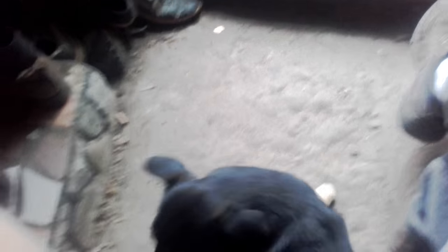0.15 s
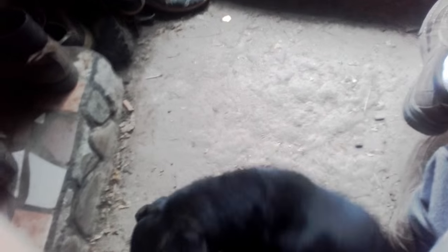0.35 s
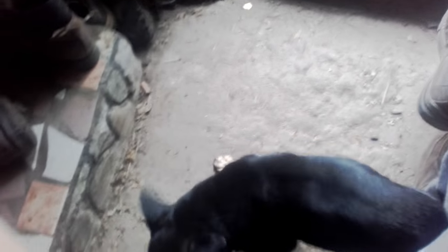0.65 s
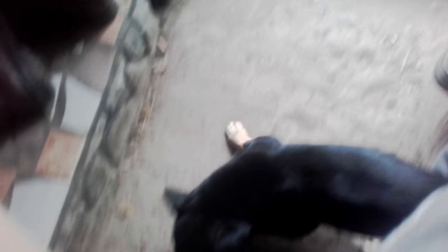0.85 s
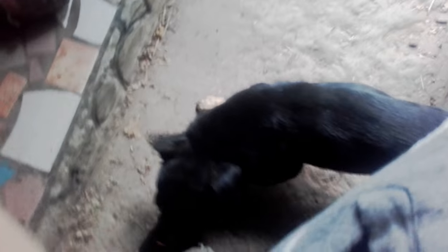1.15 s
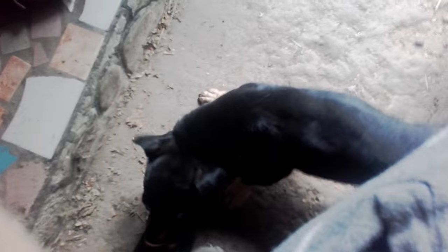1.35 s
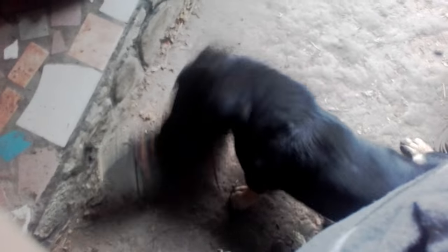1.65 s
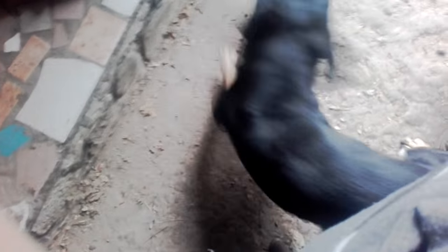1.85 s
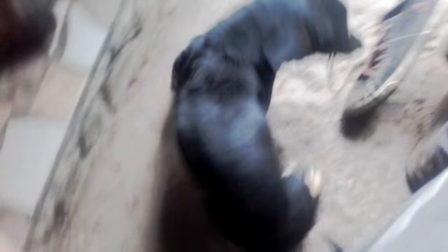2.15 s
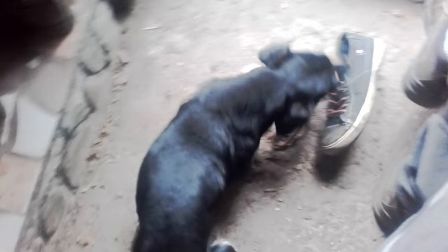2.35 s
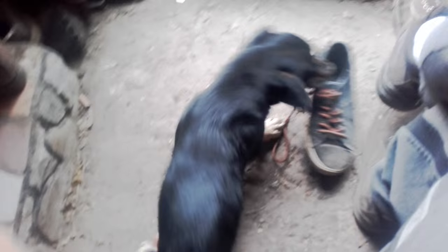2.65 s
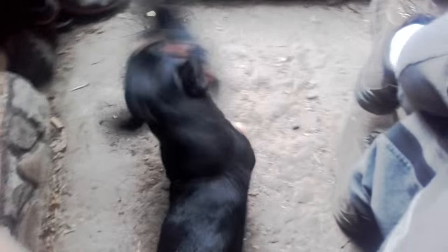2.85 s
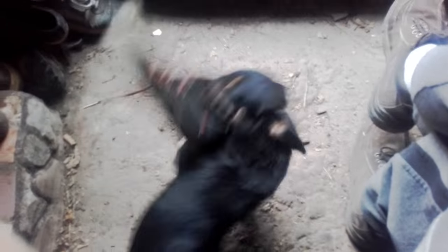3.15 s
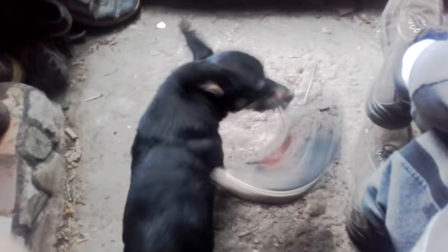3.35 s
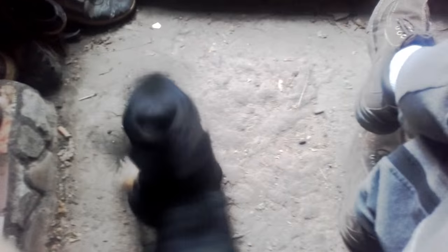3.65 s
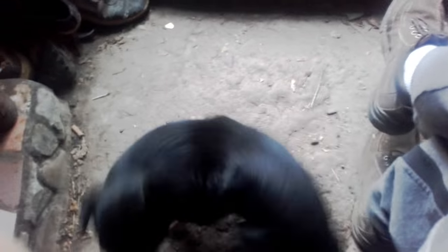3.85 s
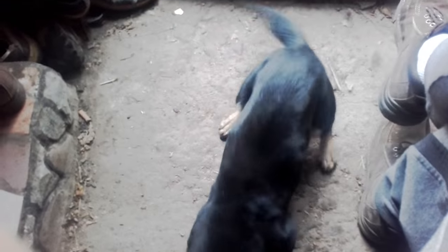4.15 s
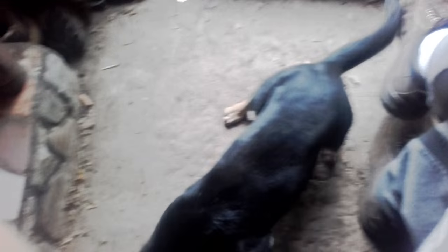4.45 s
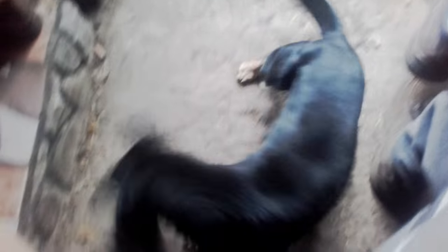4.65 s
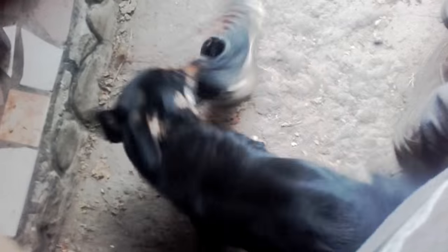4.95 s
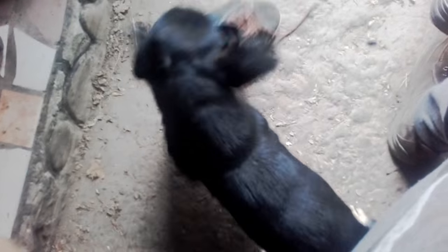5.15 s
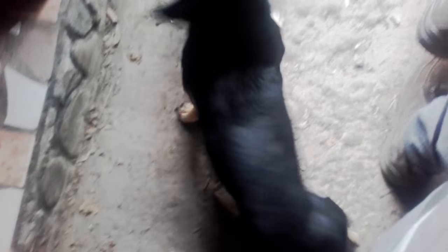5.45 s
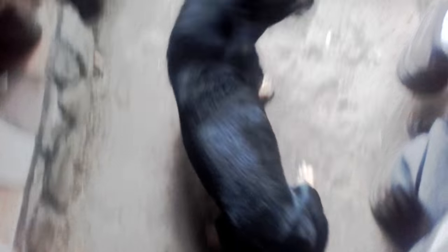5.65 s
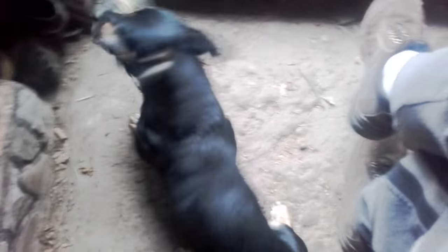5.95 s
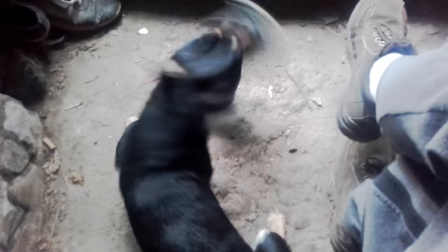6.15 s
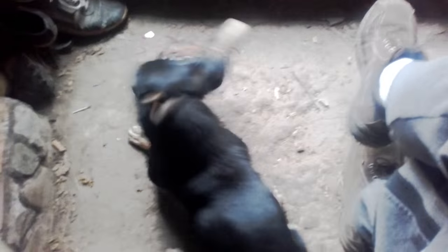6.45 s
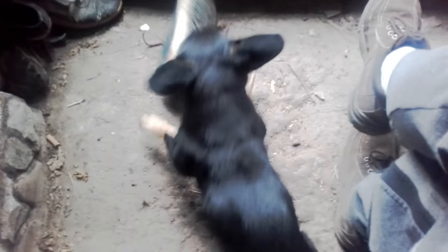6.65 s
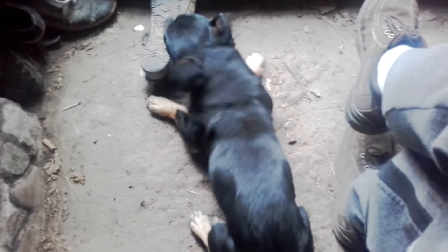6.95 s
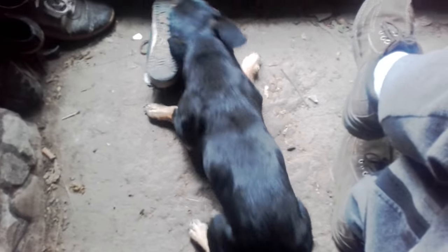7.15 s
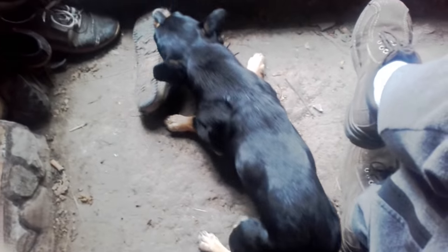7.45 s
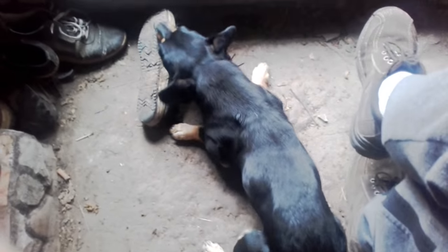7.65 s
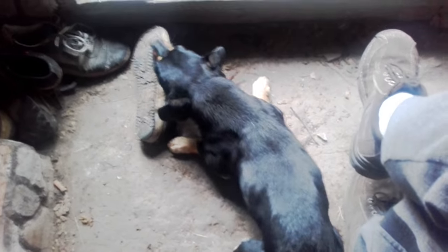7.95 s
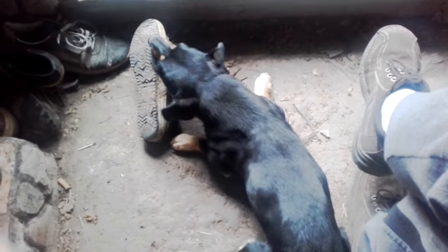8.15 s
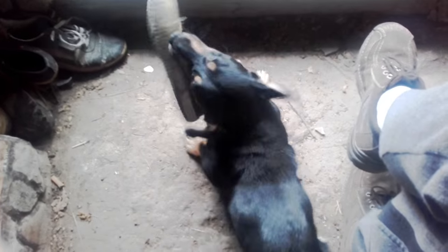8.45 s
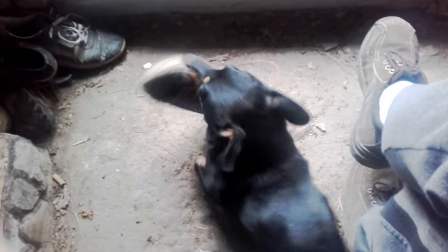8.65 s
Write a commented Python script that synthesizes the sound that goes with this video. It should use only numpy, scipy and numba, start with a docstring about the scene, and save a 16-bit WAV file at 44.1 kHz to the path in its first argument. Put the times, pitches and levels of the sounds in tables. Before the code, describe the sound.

Up close in a small hard-walled yard corner, a playful little dog snarls over a shoe. A brief opening growl gives way to puffing snorts, light grit and a far bird, then repeated raspy growls with rattling throbs and hissing breath through the teeth. Short pauses carry sniffs, scrabbling claws and muffled thumps on dirt. The thin, slightly bass-light phone sound has only a short echo and faint steady background air.

```python
"""Small dog growling over a shoe

A small dog growls in short bouts while it worries a shoe on a dirt floor, close to a phone.
Ragged vocal-fold pulses, broken into throbs by flapping throat tissue, ring its mouth and chest.
Filtered noise bursts and swells make snorts, sniffs, knocks, claw ticks and grit; far off, gliding
sines make a bird's chirps. Resonances and sparse echoes make the corner and walls answer briefly."""
import sys
import numpy as np
from scipy import signal
from scipy.fft import rfft, irfft
from scipy.io import wavfile
from scipy.ndimage import uniform_filter1d, minimum_filter1d
from numba import njit

SR = 44100
rng = np.random.default_rng(int(sys.argv[2]) if len(sys.argv) > 2 else 0)


def dump_mix(stems):
    """Bounce the given channels to the path in sys.argv[1] as a 16-bit WAV at rate SR."""
    frames = np.atleast_2d(stems).T  # one column per channel
    limited = np.clip(frames, -1, 1)  # hard clip at full scale
    pcm = np.round(limited * 32767).astype(np.int16)
    wavfile.write(sys.argv[1], SR, pcm)


N = 388521
T = np.arange(N) / SR


def undb(db):
    """Decibels to amplitude ratio."""
    return 10 ** (np.asarray(db) / 20)


def unit(x):
    """Scale to rms 1."""
    return x / np.sqrt(np.mean(x ** 2))


def steady(x, window_s=0.11):
    """Even out slow swells to rms near 1, keeping changes faster than the window."""
    size = int(window_s * SR)
    power = uniform_filter1d(uniform_filter1d(x ** 2, size), size)
    return x / np.sqrt(np.abs(power) + 1e-12)


def noise():
    """White noise of spread 1."""
    return rng.standard_normal(N)


def walk(rate_hz):
    """Smooth random curve of rms 1 that draws a new target rate_hz times a second."""
    size = int(SR / rate_hz)
    steps = rng.standard_normal(N // size + 1)[np.arange(N) // size]
    return unit(uniform_filter1d(steps, size))


@njit
def svf(x, hz, width_hz):
    """State-variable band-pass with a moving centre."""
    y, band_state, low_state = np.empty(len(x)), 0., 0.
    for i in range(len(x)):
        g, k = np.tan(np.pi * hz[i] / SR), width_hz / hz[i]
        v = (band_state + g * (x[i] + 1e-18 - low_state)) / (1 + g * (g + k))
        band_state, low_state, y[i] = 2 * v - band_state, low_state + 2 * g * v, k * v
    return y


def ring(x, hz, width_hz):
    """Resonance with steep skirts: two equal band-passes in series, width_hz each."""
    centre_hz = np.clip(hz * np.ones(N), 30, SR * .45)
    once = svf(x, centre_hz, float(width_hz))
    return svf(once, centre_hz, float(width_hz))


def cavity(x, modes, stretch=1):
    """Several parallel resonances that shift together."""
    return sum(undb(db) * ring(x, hz * stretch, width_hz) for hz, width_hz, db in modes)


def colour(x, points):
    """Shape a sound by a (Hz, dB) spectrum, straight lines over log frequency."""
    hz, db = np.transpose(points)
    bins_hz = np.maximum(np.fft.rfftfreq(N, 1 / SR), 1)
    gain_db = np.interp(np.log(bins_hz), np.log(hz), db)
    return irfft(rfft(x) * undb(gain_db), N)


def band(x, low_hz, high_hz, order=5):
    """Band-pass, steep by default."""
    return signal.sosfilt(signal.butter(order, [low_hz, high_hz], "band", fs=SR, output="sos"), x)


def burst(start_s, t60_s, rise_s):
    """Envelope of a quick push that dies away."""
    out = np.zeros(N)
    live = slice(*np.searchsorted(T, [start_s, start_s + 2 * t60_s]))
    age_s = T[live] - start_s
    out[live] = (1 - np.exp(-age_s / rise_s)) * np.exp(-age_s / t60_s * np.log(1000))
    return out


def follow(rows):
    """Join the points of a curve by straight lines: one control a column."""
    s, *columns = np.transpose(rows)
    return [np.interp(T, s, column) for column in columns]


def during(course, fade_s):
    """1 while a gesture lasts, fading to 0 on both sides."""
    first_s, last_s = course[0][0], course[-1][0]
    return np.interp(T, [first_s - fade_s, first_s, last_s, last_s + fade_s], [0, 1, 1, 0])


def yard_air(level_db=-63, waver_db=1.3):
    """Steady coloured noise of the quiet yard, wavering slightly."""
    # air spectrum: hz, level_db
    air_colour = [(100, -15.5), (300, -5), (1800, -1.5), (3300, -17), (5200, -19.5), (15000, -20.5)]
    return unit(colour(noise(), air_colour)) * undb(level_db + waver_db * walk(21))


def rumble(level_db=-88):
    """Faint low noise of the hand-held microphone."""
    return unit(ring(noise(), 30, 60)) * undb(level_db)


def tension(hz, usual_rough=.81, clearing_s=.08):
    """Pitch and roughness (0-1) of the folds: ragged, except where they settle into a clear tone."""
    # clear gliding tones, one list each: time_s, pitch_hz, roughness (0-1)
    clear_tones = [
        [(0.328, 360.4, 0.63), (0.42, 348.5, 0.28), (0.488, 315, 0.05), (0.55, 272, 0.19), (0.63, 226.4, 0.33)],
        [(2.25, 351.7, 0.59), (2.46, 304.8, 0.33), (2.64, 300.6, 0.23), (2.8, 322.6, 0.25), (2.95, 322.5, 0.63)],
        [(3.88, 316.7, 0.6), (4.03, 307.8, 0.49)],
        [(4.81, 388.7, 0.56), (4.86, 380.2, 0.46), (4.92, 344.7, 0.24), (5.03, 326.8, 0.25),
         (5.13, 280.4, 0.18), (5.25, 270.8, 0.5)],
        [(5.86, 344.9, 0.6), (6.02, 385.3, 0.62), (6.4, 365.4, 0.7), (6.54, 316, 0.46)],
    ]
    rough = usual_rough
    for tone in clear_tones:
        share = during(tone, clearing_s)
        tone_hz, tone_rough = follow(tone)
        hz = hz + share * (tone_hz - hz)
        rough = rough + share * (tone_rough - rough)
    return hz, np.clip(rough, 0, 1)


def folds(hz, rough, jitter=.15, shimmer_db=4, breath_db=2, limp_db=3, leak=0.94):
    """One pulse a cycle, and air through folds that never quite close; when rough, cycles wander and limp."""
    wander = np.exp(jitter * rough * walk(260) + .03 * walk(45))
    cycles = np.cumsum(hz * wander) / SR
    count, phase = cycles.astype(int), cycles % 1
    # random size each cycle; alternate cycles strong and weak
    size = undb(rough * (shimmer_db * noise()[count] + limp_db * (-1) ** count))
    pulses = unit(np.sinc((phase - .5) * SR / hz / 2))
    opening = leak + np.exp(-2 * ((phase - .5) % 1))
    air = size * unit(noise() * opening)
    voice = (1 - 0.5 * rough) * size * pulses + undb(breath_db) * rough * air
    hum = np.cos(2 * np.pi * cycles)
    return voice, air, hum


def flutter(depth_db, rate_hz=36, spread=.28, uneven=0.3, half_s=0.0077, clear_s=.021):
    """Loose throat tissue flaps unevenly and lets the voice out in flat-topped throbs; gives dB."""
    # hardest jolts, before each part's depth factor: time_s, height_db
    jolts = [(0.243, 8), (0.274, 10), (0.376, 23), (0.418, 22), (0.452, 23), (0.495, 15), (2.242, 7.5),
             (2.263, 5.5), (2.314, 12.5), (2.341, 9), (2.379, 9), (2.4, 12.5), (2.428, 13), (2.498, 14),
             (2.537, 6), (2.597, 18.5), (2.678, 17), (2.799, 9), (2.851, 12), (2.956, 8.5), (3.546, 6),
             (3.567, 11), (3.593, 8.5), (3.608, 18), (3.631, 12.5), (3.652, 12), (3.679, 13.5),
             (3.726, 9.5), (3.809, 5.5), (3.893, 6), (3.934, 4.5), (3.966, 9), (4.028, 11), (4.812, 3.5),
             (4.831, 10), (4.857, 14.5), (4.884, 12), (4.927, 15), (4.969, 24), (5.009, 21.5), (5.265, 12),
             (5.333, 15), (5.354, 10), (5.873, 2), (5.922, 7.5), (6.019, 4.5), (6.096, 9), (6.123, 10),
             (6.155, 5.5), (6.173, 4), (6.268, 7), (6.297, 8.5), (6.332, 16.5), (6.398, 9.5), (6.502, 14),
             (7.121, 19.5), (7.153, 9), (7.238, 12.5), (7.275, 14.5), (7.313, 6), (7.355, 5), (7.429, 11),
             (7.475, 7.5), (7.597, 10.5), (8.214, 10), (8.284, 5), (8.325, 5.5), (8.402, 5.5), (8.438, 7),
             (8.594, 3.5), (8.639, 8), (8.696, 15), (8.765, 12), (8.799, 10)]
    chance = rng.standard_normal((600, 2))
    times_s = np.cumsum(np.exp(spread * chance[:, 0])) / rate_hz
    heights_db = np.interp(times_s, T, depth_db) * np.exp(uneven * chance[:, 1])
    jolt_s = np.array(jolts)[:, 0]
    # weaker flaps only where no jolt is near
    weak = [(s, height) for s, height in zip(times_s, heights_db) if np.abs(s - jolt_s).min() > clear_s]
    db = np.zeros(N)
    for s, height in list(jolts) + weak:
        near = slice(*np.searchsorted(T, [s - 2 * half_s, s + 2 * half_s]))
        flap = height * np.exp(-np.abs((T[near] - s) / half_s) ** 3)
        db[near] = np.maximum(db[near], flap)
    return db


def rattle(rough, depth_db=4.5, rate_hz=68, spread=.15):
    """When ragged, the false folds slap open unevenly: each slap starts sharply and dies away; gives dB."""
    phase = np.cumsum(rate_hz * np.exp(spread * walk(60))) / SR % 1
    return uniform_filter1d(depth_db * rough * (.5 - phase), size=64)


def bounces(x, gain=1.0, swing=0.371):
    """Head swings close above the floor: two short, shifting reflections sweep notches through the treble."""
    out = x
    for mid_lag_s in (.0009, .0026):
        lag_s = mid_lag_s * np.exp(swing * walk(9) * .0009 / mid_lag_s)
        out = out + gain * np.interp(T - lag_s, T, x)
    return out


def snarl(air, width_hz=900, quiver=0.057, fade_s=0.034):
    """Air rings the gap under the lifted lip, narrow and gliding; gives the sound and its share in dB."""
    # lip lifts, one list each: time_s, resonance_hz, share_db
    lifts = [
        [(0.19, 5060, -30.5), (0.4, 5330, -30), (0.47, 4650, -17), (0.56, 4340, -22)],
        [(2.145, 4612, -10), (2.18, 3783, -22.5), (2.265, 4630, -26), (2.45, 4000, -27)],
        [(2.68, 2773, -17.5), (3.06, 2665, -12)],
        [(3.56, 2553, -21.5), (3.7, 2803, -19.5)],
        [(3.86, 5050, -19.5), (4.04, 5140, -30.5)],
        [(4.83, 3850, -19), (5.11, 4300, -19.5)],
        [(5.21, 2490, -7.5), (5.32, 2577, -13), (5.4, 3335, -5.5), (5.48, 3610, -3)],
        [(5.84, 3066, -18.5), (5.88, 3254, -16), (5.92, 4586, -27.5), (6.08, 4853, -25)],
        [(6.42, 5404, -26), (6.47, 4700, -29.5), (6.54, 5227, -17)],
        [(7.03, 2496, -23), (7.5, 3012, -20), (7.77, 2774, -31)],
        [(8.21, 2419, -52), (8.64, 2738, -17)],
        [(8.72, 5098, -26), (8.8, 5284, -22.5)],
    ]
    hz, share_db = follow([row for course in lifts for row in course])
    lifted = sum(during(course, fade_s) for course in lifts)
    sound = ring(air, hz * np.exp(quiver * walk(40)), width_hz)
    return sound, share_db + 20 * np.log10(np.clip(lifted, 1e-3, 1))


def throb(x, range_hz, depth_db, flicker_db=3.5):
    """Chop one resonance into throbs; each flap favours the resonances differently."""
    even = steady(band(x, *range_hz), .008)
    chopped = even * undb(depth_db + flicker_db * walk(70))
    return steady(band(chopped, *range_hz, order=2), .05)


def growl(throat_width_hz=300, pharynx_width_hz=440, palate_hz=1250, palate_width_hz=450, palate_db=-14,
          chest_hz=290, chest_width_hz=360, hum_db=-3.0, throat_db=0, teeth_db=-3, chew=0.099):
    """Throbbing voice rings throat, mouth and chest; effort sets pitch and balance, jaw shifts resonances."""
    # growls at middling effort: start_s, end_s, pitch_hz, chest_share_db, pharynx_hz, pharynx_share_db,
    # rasp_share_db, flutter_depth_db
    bout_table = [(0.131, 0.646, 337, -24, 750, -7.5, -19.5, 3.5),
                  (2.139, 3.109, 317.7, -14.5, 617, -7.5, -20.5, 3),
                  (3.535, 4.369, 305, -17, 761.7, -11, -14, 3.5),
                  (4.807, 5.495, 320.7, -16.5, 688.7, -6, -18, 10),
                  (5.81, 6.669, 344.7, -23, 632, -7.5, -21, 5.5),
                  (6.659, 6.936, 349.6, -23, 711, -1, -14, 8),
                  (7.007, 7.834, 381.1, -12.5, 706, -2.5, -19, 5.5),
                  (8.182, 8.814, 299.3, -19, 579.4, -7.5, -19, 5)]
    # course of each growl: time_s, effort_db, first_mouth_resonance_hz, bared_teeth_brightness_db
    courses = [
        [(0.13, -47, 1070, -49), (0.19, -28, 1030, -15.5), (0.27, -25, 960, -21), (0.42, -26.5, 1054, -16),
         (0.58, -44.5, 1050, -4.5), (0.68, -66, 1450, 12)],
        [(2.14, -25, 780, -5.5), (2.25, -15, 1176, -7), (2.34, -19, 1080, -16), (2.43, -24.5, 1043, -21),
         (2.7, -37.5, 1000, 4), (2.82, -30.5, 1010, -1), (2.98, -26.5, 840, -5.5), (3.08, -35.5, 1009, 1.5),
         (3.13, -48, 895, -23)],
        [(3.535, -16, 960, -8.5), (3.61, -10.5, 1302, -14.5), (3.68, -16.5, 1225, -10), (3.76, -28, 1023, -8),
         (3.81, -16, 916, -8.5), (3.93, -15.5, 893, -11.5), (4.03, -16.5, 935.3, -16.5), (4.09, -36, 940, 3),
         (4.29, -39.5, 1240, 3), (4.36, -55, 1292, -16)],
        [(4.81, -21, 1191, -2.5), (4.86, -16.5, 1130, -2.5), (4.97, -21, 1035, -2), (5.06, -27, 1052, -0.5),
         (5.17, -39, 985, -5.5), (5.27, -37, 1042, -4.5), (5.45, -40, 1330, -2), (5.51, -53, 1400, 1)],
        [(5.815, -25, 905.3, -10.5), (5.86, -12.5, 959.4, -10), (5.95, -18.5, 948, -11), (6.03, -13, 846.3, -7),
         (6.19, -16.5, 833.5, -5.5), (6.3, -11, 912.4, -9), (6.51, -17.5, 982, -13), (6.58, -30.5, 1002, 1),
         (6.66, -43, 1020, -3.5)],
        [(6.73, -41.5, 941, 2.5), (6.8, -53, 1003, 0.5), (6.87, -39, 818, 2.5), (6.94, -54, 951, -6)],
        [(7.01, -30.5, 862.4, -11), (7.04, -26.5, 902.5, -10.5), (7.21, -28.5, 905, -13.5),
         (7.38, -23.5, 1146, -6), (7.52, -26.5, 969, -5), (7.68, -30.5, 1010, 0.5), (7.78, -40, 1148, 0),
         (7.84, -59.5, 1230, -24)],
        [(8.185, -29, 1155, -2.5), (8.22, -20.5, 1058, -7), (8.32, -20.5, 1040, -2.5),
         (8.42, -15.5, 1156, -9.5), (8.51, -17.5, 1055, -3.5), (8.62, -19, 1150, -8), (8.7, -21, 1169, -2.5),
         (8.78, -18, 1054, -10)],
    ]
    # upper mouth resonances: hz, width_hz, level_db
    mouth_modes = [(1636, 475, 18.5), (2050, 790, 8.5), (2720, 1200, -1.5), (3400, 1300, -1)]
    # air rasping past the teeth: hz, width_hz, level_db
    teeth_modes = [(5120, 2600, -2.5), (6900, 980, -4.5), (8700, 1400, -11), (13700, 2100, -25)]
    # range each airway part radiates, by name: low_hz, high_hz
    ranges_hz = {"chest": (168, 490), "throat": (430, 1600), "mouth": (1350, 3300), "snarl": (2000, 7000),
                 "rasp": (3300, 15000)}
    middling_db, step_db = -30, 10
    pitch_rise_oct = .09  # per effort step: pushing harder tightens the folds
    chest_lag_db, rasp_lag_db, slack_flutter_db = 6, 4, 1.1  # lost per effort step
    clear_chest_db, even_rough = 18, .81  # chest gain per unit of roughness below even_rough
    bared_rasp_db = 4.5  # rasp gain per brightness step

    bouts = np.array(bout_table)
    current = np.maximum(np.searchsorted(bouts[:, 0], T) - 1, 0)
    start_s, end_s, pitch_hz, chest_share_db, pharynx_hz, pharynx_db, rasp_share_db, flutter_db = bouts[current].T
    level_db, throat_hz, bright_db = follow([row for course in courses for row in course])
    push = (level_db - middling_db) / step_db  # effort steps above middling
    hz, rough = tension(pitch_hz * 2 ** (pitch_rise_oct * push))
    chest_db = chest_share_db - chest_lag_db * push + clear_chest_db * (even_rough - rough)
    rasp_db = teeth_db + rasp_share_db - rasp_lag_db * push + bared_rasp_db * bright_db / step_db

    voice, air, hum = folds(hz, rough)
    flap_db = flutter(np.maximum(flutter_db - slack_flutter_db * push, 0)) + rattle(rough)
    jaw = (throat_hz / 1000) ** .25 * np.exp(.06 * walk(45) + chew * walk(11))
    throat = ring(voice, throat_hz * np.exp(0.052 * walk(50)), throat_width_hz)
    pharynx = (pharynx_hz, pharynx_width_hz, pharynx_db)
    palate = (palate_hz, palate_width_hz, palate_db)
    throat += cavity(voice, [pharynx, palate], jaw)
    # higher up, turbulent air joins the pulses
    mouth = bounces(cavity(0.37 * voice + air, mouth_modes, jaw))
    rasp = bounces(cavity(air, teeth_modes, np.sqrt(jaw)))
    # chest hums on between flaps, cleanly when the folds run evenly
    chest = rough * steady(ring(voice, chest_hz, chest_width_hz))
    chest = chest + undb(hum_db) * (1 - rough) ** 2 * hum
    # each part: sound, share_db, how deeply the flaps cut it
    parts = {"chest": (chest, chest_db, .35), "throat": (throat, throat_db, 1.1),
             "mouth": (mouth, bright_db, .9), "snarl": (*snarl(air), .5), "rasp": (rasp, rasp_db, .7)}
    sound = sum(throb(x, ranges_hz[name], depth * flap_db) * undb(db)
                for name, (x, db, depth) in parts.items())
    sounding = uniform_filter1d(1. * ((T > start_s) & (T < end_s)), size=300)
    return sounding ** 2 * undb(level_db) * sound


def claws(tick_hz=8000, width_hz=11000, t60_s=0.015, rise_s=0.00028):
    """Small, bright ticks of claws and grit as the paws scrabble: short bursts of ringing noise."""
    # ticks on the ground: start_s, level_db
    ticks = [(0.425, -45), (1.731, -59), (1.822, -53), (2.091, -49), (2.524, -46), (3.507, -33),
             (3.57, -27), (3.703, -36), (4.122, -34), (4.237, -41), (4.25, -41), (6.913, -41)]
    envelope = sum(undb(db) * burst(s, t60_s, rise_s) for s, db in ticks)
    return unit(ring(noise(), tick_hz, width_hz)) * envelope


def sniffs(flicker_db=3.5):
    """Sniffs and huffs between growls: soft, uneven swells of air through the dog's muzzle."""
    # swells: middle_s, half_length_s, level_db
    swells = [(1.044, 0.067, -51), (1.065, 0.65, -70), (2.073, 0.055, -52), (3.296, 0.088, -58.5),
              (3.515, 0.042, -48), (4.605, 0.052, -57), (4.786, 0.14, -49), (5.69, 0.059, -48)]
    # muzzle spectrum: hz, level_db
    muzzle_colour = [(100, -27), (300, -8), (900, -1), (1800, -2), (3300, -11), (5200, -9), (9000, -23.5),
                     (14000, -38.5)]
    envelope = sum(undb(db) * np.exp(-((T - s) / half_s) ** 2) for s, half_s, db in swells)
    return unit(colour(noise(), muzzle_colour)) * envelope * undb(flicker_db * walk(130))


def scuffle(t60_s=0.083, knock_db=-7, grit_db=-67, patchy_db=3, grains_hz=4000):
    """Paws and shoe knock dully on packed dirt; fine grit, as random grains, shifts while the paws move."""
    # knocks: start_s, level_db (before knock_db)
    knock_table = [(1.822, -33), (1.917, -45.5), (2.454, -18), (3.402, -37.5), (3.45, -38), (4.176, -17),
                   (4.375, -34), (4.809, -16), (5.767, -25.5), (6.573, -12), (6.623, -19.5), (6.811, -27)]
    # packed-dirt spectrum: hz, level_db
    dirt_colour = [(100, -14), (300, -16), (900, 2), (1800, -1.5), (3300, -12.5), (5200, -18),
                   (9000, -40.5), (14000, -43)]
    # paws moving on the grit: start_s, end_s
    moves = [(0.7, 4.39), (4.565, 6.93)]
    knocks = sum(undb(db + knock_db) * burst(s, t60_s, 0.0004) for s, db in knock_table)
    grains = noise() * (rng.random(N) < grains_hz / SR) * undb(1.5 * rng.exponential(size=N))
    moving = uniform_filter1d(sum(1. * ((T > start_s) & (T < end_s)) for start_s, end_s in moves), size=400)
    grit = moving * unit(ring(grains, 3500, 7700)) * undb(grit_db + patchy_db * walk(4.3))
    return unit(colour(noise(), dirt_colour)) * knocks + grit


def snorts(rise_s=0.0007):
    """The soft palate lets go puffs of air that ring the nose and hiss at the nostrils."""
    # puffs: start_s, level_db, t60_s, nostril_hiss_share_db
    puffs = [(0.712, -25, 0.1, -35), (1.269, -27.5, 0.3, -12), (1.296, -24, 0.15, -14.5),
             (1.326, -23.5, 0.13, -13.5), (1.354, -31.5, 0.11, -8), (1.384, -45, 0.11, -6)]
    # nasal passages: hz, width_hz, level_db
    nose_modes = [(376, 270, 4), (690, 540, -23), (1175, 130, 1), (1725, 285, 9.5), (1970, 350, 2.5)]
    # nostril hiss: hz, width_hz, level_db
    nostril_modes = [(3080, 710, 7.5), (4880, 2200, 8), (6670, 720, 3), (10900, 2900, -10.5)]
    nose = unit(cavity(noise(), nose_modes))
    hiss = unit(cavity(noise(), nostril_modes))
    return sum(undb(db) * burst(s, t60_s, rise_s) * (nose + undb(hiss_db) * hiss)
               for s, db, t60_s, hiss_db in puffs)


def bird(waver=.035):
    """Far bird: thin, wavering, falling whistles from gliding sines."""
    # chirps: start_s, length_s, start_hz, end_hz, level_db
    chirps = [(1.575, 0.055, 3050, 1750, -59.5), (2, 0.099, 3221, 2600, -52.5)]
    out = 0
    for s, length_s, start_hz, end_hz, db in chirps:
        along = np.clip((T - s) / length_s, 0, 1)
        hz = (start_hz + (end_hz - start_hz) * along) * (1 + waver * walk(400))
        whistle = np.sin(2 * np.pi * np.cumsum(hz) / SR)
        out = out + undb(db) * np.sin(np.pi * along) * whistle
    return out


def echoes(x, decay_s=0.21, gap_s=0.0096):
    """Sparse early echoes from floor and walls that thicken into a short, dull tail."""
    age_s = T[:SR // 2]
    taps = rng.standard_normal(len(age_s)) * (rng.random(len(age_s)) < .01 + age_s) * (age_s > gap_s)
    dull = signal.sosfilt(signal.butter(1, 5000, fs=SR, output="sos"), taps / np.sqrt(gap_s + age_s))
    tail = dull * undb(-60 * age_s / decay_s)
    return signal.fftconvolve(x, tail / np.linalg.norm(tail))[:N]


def walls(x, wet_db=-11):
    """The corner rings steadily, while the pattern of echoes shifts as the dog turns about."""
    # corner of floor and kerb: hz, width_hz, level_db
    corner_modes = [(780, 140, -6.5), (916, 146, -10)]
    turn_rad = 2 * walk(1.999)
    wet = np.cos(turn_rad) * echoes(x) + np.sin(turn_rad) * echoes(x)
    return x + cavity(x, corner_modes) + undb(wet_db) * wet


def scene():
    """The dog and its scuffle in a quiet yard."""
    sources = growl() + claws() + sniffs() + scuffle() + snorts() + bird()
    return (walls(sources) + yard_air())[None]


def record(dry, low_cut_hz=125, top_hz=15800, start_s=.13, ceiling=.9):
    """The phone opens a moment late, limits the loudest throbs, thins the bass and cuts the top."""
    peak = uniform_filter1d(-minimum_filter1d(-np.abs(dry), size=300), size=300)
    limited = dry / np.maximum(peak / ceiling, 1)
    thin = signal.sosfilt(signal.butter(4, low_cut_hz, "high", fs=SR, output="sos"), limited)
    opened = (thin + rumble()) * (T > start_s)
    return signal.sosfilt(signal.ellip(8, .2, 70, top_hz, fs=SR, output="sos"), opened)


dry = scene()
out = record(dry)
dump_mix(out)
```